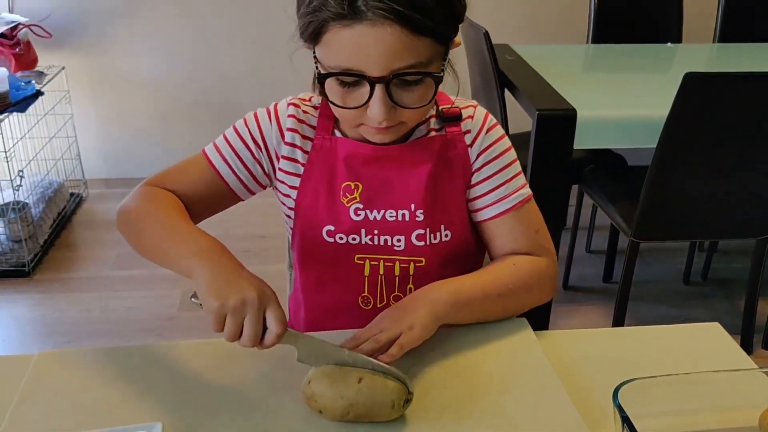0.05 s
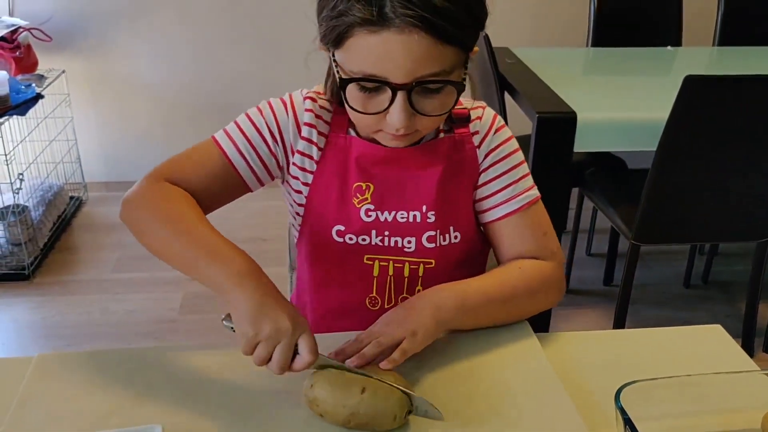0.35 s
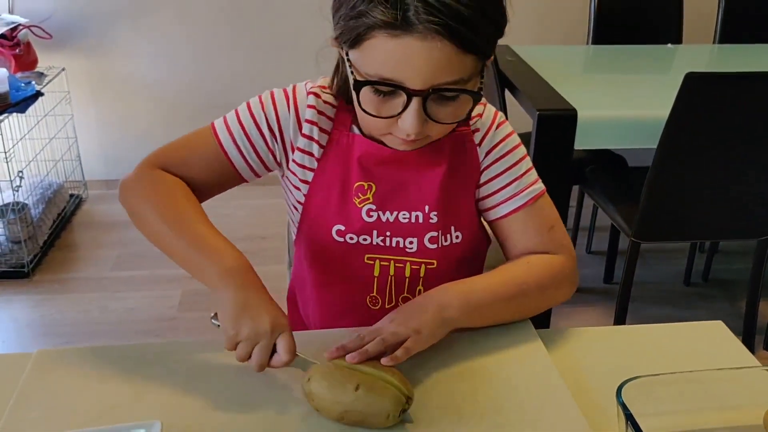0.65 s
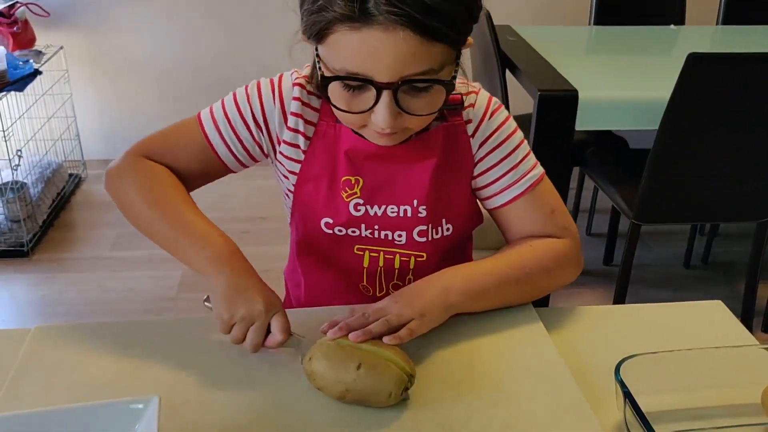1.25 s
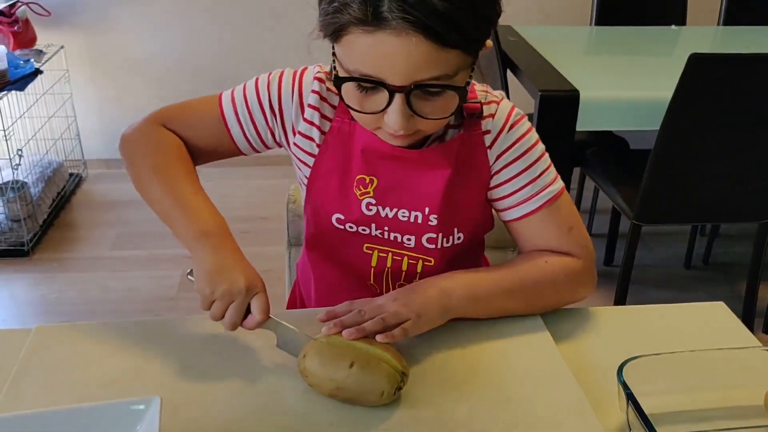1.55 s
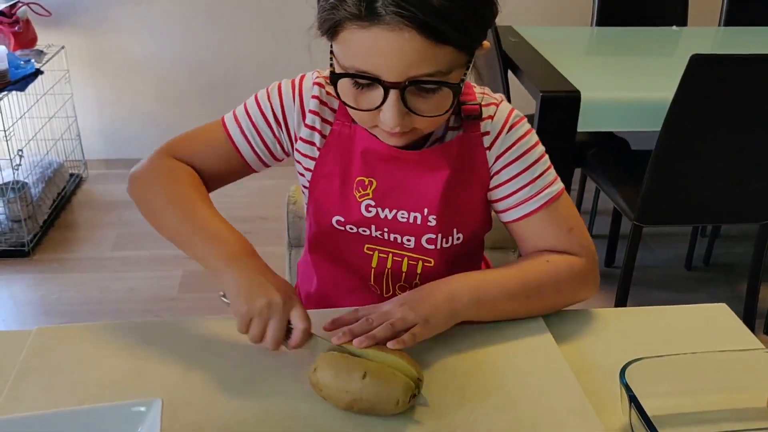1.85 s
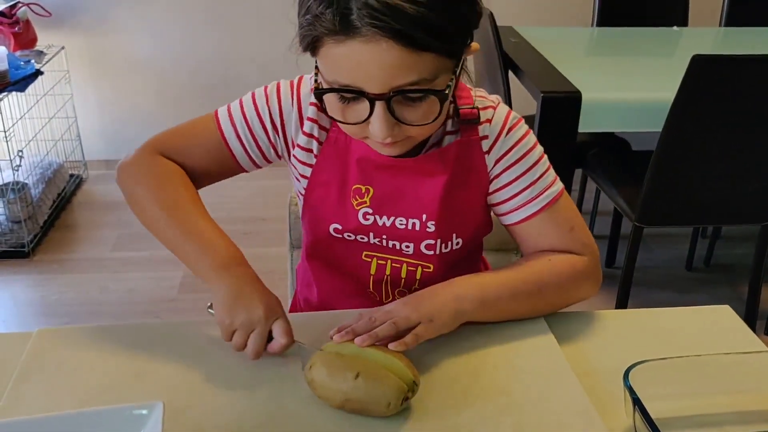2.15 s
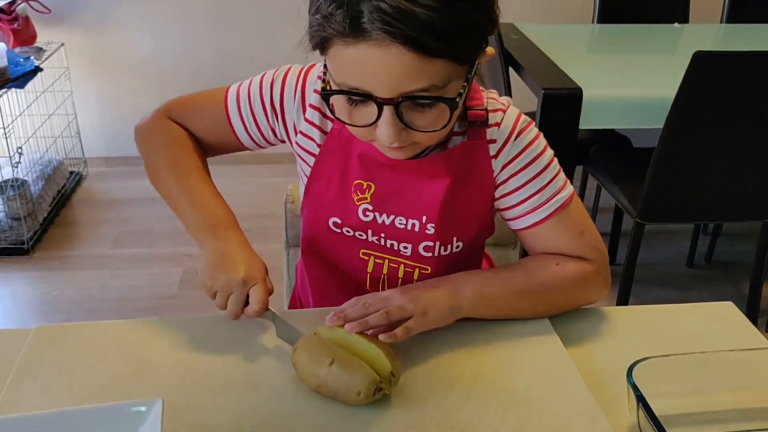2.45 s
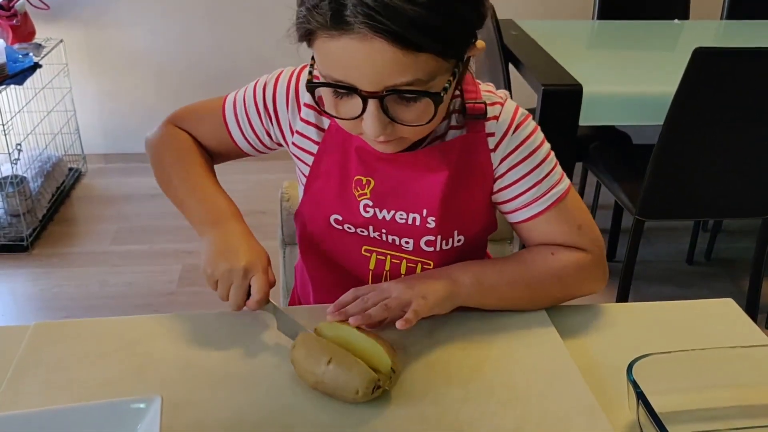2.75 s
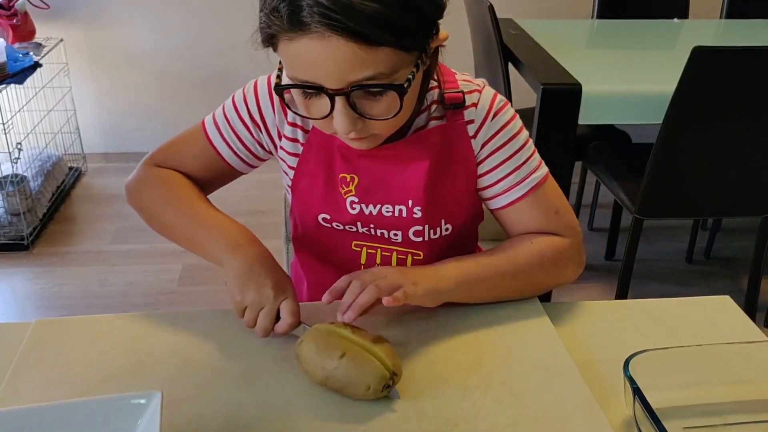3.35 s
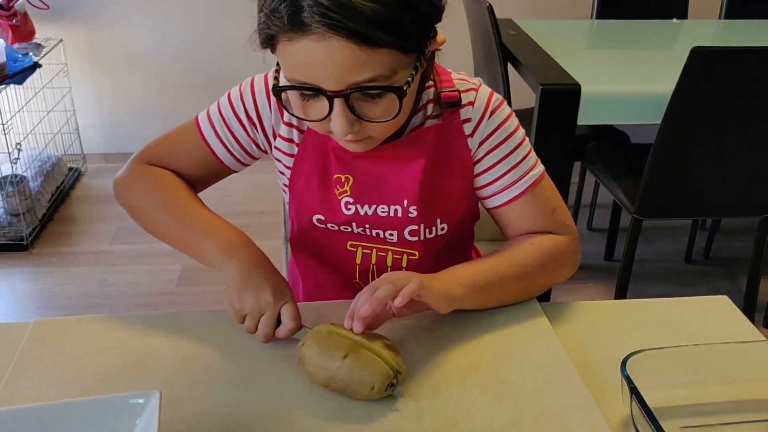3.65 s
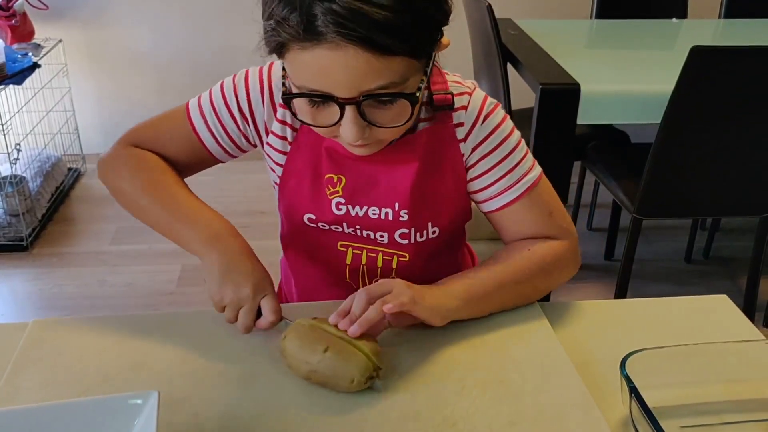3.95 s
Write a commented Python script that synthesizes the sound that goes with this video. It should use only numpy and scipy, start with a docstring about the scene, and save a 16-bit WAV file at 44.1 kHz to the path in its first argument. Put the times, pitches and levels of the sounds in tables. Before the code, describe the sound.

Soft scratchy knife strokes cut a baked potato on a table over a low appliance hum.

```python
"""A baked potato is cut on a table in a quiet kitchen, heard on a left and a right microphone.
From the start an appliance hums in the room tone and a thin whine slowly rises. Two taps land close
to the right microphone as the knife starts sawing, its rasp made of friction and tiny tears of skin.
About a second in, the blade knocks on the table and rebounds. The uneven strokes go on, and in the
second half hand and potato bump softly on the table."""
import sys
import numpy as np
from scipy import signal
from scipy.fft import rfft, irfft
from scipy.io import wavfile

SR = 44100
rng = np.random.default_rng(int(sys.argv[2]) if len(sys.argv) > 2 else 0)


def persist_wave(psi):
    """Save psi, clipped to +-1, as 16-bit WAV."""
    counts = np.round(np.clip(psi, -1, 1) * 32767).astype(np.int16)
    wavfile.write(sys.argv[1], SR, np.atleast_2d(counts).T)


N = 176400
T = np.arange(N) / SR

# Room tone at the microphones. Each row: frequency in Hz, left and right level in relative dB.
AIR_SPECTRUM = [(19.7, -1, -15), (50, 14, 1), (72.6, 0, -14.5), (151, -4.5, -8.5), (265, -7.5, -18),
                (700, -9.5, -11.5), (1460, -16, -20), (2400, -18, -20), (3500, -24, -22.5),
                (4630, -19, -20.5), (5840, -55, -16.5), (7000, -27, -52), (9850, -34, -34),
                (14800, -32.5, -32.5)]
# The appliance's tones. Each row: frequency in Hz, rms level in dB before panning.
HUM_TONES = [(50, -53), (100, -56.5), (155.5, -74), (300, -73.5), (409.5, -70.5), (444.5, -66),
             (581.5, -69), (718, -75.5), (1046, -82.5)]
# The whine's short swells. Each row: time in seconds, level in dB before panning.
WHINE_SWELLS = [(0, -68), (0.1, -57.5), (0.17, -67), (0.26, -60), (0.32, -68), (0.45, -60), (0.58, -58.5),
                (0.83, -70), (0.97, -60), (1.21, -72), (1.26, -61), (1.33, -73), (1.39, -60), (1.5, -66),
                (1.58, -60), (1.72, -71), (2.12, -69), (2.6, -61.5), (2.67, -66), (2.72, -58.5),
                (2.8, -57.5), (2.86, -69), (2.91, -61), (3.03, -63), (3.1, -58.5), (3.24, -57), (3.41, -69),
                (3.49, -62), (3.55, -71), (3.64, -59), (3.72, -66), (4, -62)]
# Taps by the right microphone.
# Each row: start in seconds, strength in dB, hardness as a cut-off in Hz, hiss level in dB.
TAP_HITS = [(0.1861, 0, 8200, -36.5), (0.5779, -13.5, 347, -47)]
# A short burst of hiss after each tap. Each row: frequency in Hz, left and right level in relative dB.
TAP_HISS_SPECTRUM = [(100, -16, 18.5), (400, -4, 11.5), (1190, 2.5, 1.5), (3500, -5, 3), (5600, 4, 5),
                     (7900, -23, 6.5), (9470, -36, -6), (10300, -40, -25)]
# The blade pushed and drawn. Each row: time in seconds, rasp level in relative dB.
STROKE_LEVELS = [(0.34, -66), (0.56, -63.5), (0.59, -58.5), (0.62, -61.5), (0.85, -66.5), (0.89, -53.5),
                 (0.975, -55.5), (1.01, -59.5), (1.09, -52), (1.14, -64), (1.19, -60), (1.27, -66.5),
                 (1.34, -57.5), (1.4, -64), (1.45, -54), (1.48, -54.5), (1.55, -66), (1.62, -67.5),
                 (1.66, -56), (1.82, -52), (1.89, -59.5), (1.99, -67.5), (2.16, -60.5), (2.24, -50.5),
                 (2.33, -50.5), (2.38, -58.5), (2.47, -49.5), (2.63, -66.5), (3.21, -70), (3.39, -61),
                 (3.55, -71.5), (3.64, -68), (3.71, -56.5), (3.95, -59), (3.98, -51.5), (4.0, -52)]
# The rasp is brightest on the long push. Each row: time in seconds, treble lift and bass cut in dB.
STROKE_TILT = [(1.4, -1.5), (1.8, 1), (2.2, -1.5)]
# The rasp at the microphones. Each row: frequency in Hz, left and right level in relative dB.
RASP_SPECTRUM = [(500, -18.5, -16), (1460, -23, -22), (1990, -17, -26), (2610, -13, -16),
                 (3470, -17, -22.5), (4460, -10, -16), (4430, -4.5, -33), (5860, 1.35, -12),
                 (6460, -3.5, -10.5), (7480, -27.5, -3), (8060, -21, -6), (9210, -29, -21.5),
                 (9800, -42, -32), (14000, -30, -30)]
# Larger snaps of the skin. Each row: start in seconds, strength in dB.
SKIN_SNAPS = [(0.515, -25.5), (0.583, -32), (0.965, -19), (1.04, -15), (1.083, -23), (1.19, -28),
              (2.04, -31), (2.88, -29), (3.375, -25.5)]
# The blade on the table. Each row: start in seconds, strength in dB, thinness as a low cut in Hz.
BLADE_KNOCKS = [(1.0327, -42.5, 0), (1.051, -43, 2400)]
# Damped modes of blade and table. Each row: frequency in Hz, gain in dB, seconds to fall by 60 dB.
BLADE_TABLE_MODES = [(660, 7, 0.035), (800, 1, 0.03), (1020, 9, 0.028), (1400, 1, 0.035), (1680, 2, 0.025),
                     (2120, 0, 0.04), (2570, 7, 0.022), (3090, -4, 0.035)]
# Hand and potato on the table. Each row: start in seconds, strength in dB.
TABLE_BUMPS = [(2.19, -9), (3.21, -7), (3.745, -14), (3.855, -6.5)]


def from_db(db):
    """Decibels to gain."""
    return 10 ** (np.asarray(db) / 20)


def rms_one(x):
    """Scale to unit rms."""
    return x / np.sqrt(np.mean(x ** 2) + 1e-20)


def pan(db):
    """Gains at the two microphones; positive leans left."""
    return from_db(np.array([[db], [-db]]))


def curve(rows):
    """Join rows of time and value by straight lines."""
    return np.interp(T, *np.transpose(rows))


def drift(rate_hz):
    """Slow random wander with a spread of 1."""
    hop, settle = 40, 2000
    pole = np.exp(-2 * np.pi * rate_hz * hop / SR)
    noise = rng.standard_normal(N // hop + settle + 2)
    slow = signal.lfilter([1], [1, -2 * pole, pole * pole], noise)[settle:]
    return np.interp(np.arange(N) / hop, np.arange(len(slow)), rms_one(slow))


def butter(x, hz, kind, order=2):
    """Butterworth low-, high- or band-pass."""
    sos = signal.butter(order, np.clip(hz, 10, 0.45 * SR), kind, fs=SR, output="sos")
    return signal.sosfilt(sos, x + 1e-18)


def colour(x, spectrum):
    """Give each microphone its spectrum, keeping the overall power of white noise."""
    hz, *sides = np.transpose(spectrum)
    log_hz = np.log(np.arange(N // 2 + 1) * SR / N + 1)
    gains = from_db([np.interp(log_hz, np.log(hz), side) for side in sides])
    return irfft(rfft(x) * rms_one(gains), N)


def clicks(rows):
    """One impulse for each row of start in seconds and strength in dB."""
    out = np.zeros(N)
    for start, db in rows:
        out[int(start * SR)] += from_db(db)
    return out


def decay(t, t60):
    """A fade that falls by 60 dB in t60 seconds."""
    return np.exp(-np.log(1000) * t / t60)


def ring(x, hz, t60):
    """A unit click sets a sine of height 1 ringing."""
    pole, angle = decay(1 / SR, t60), 2 * np.pi * hz / SR
    return signal.lfilter([0, np.sin(angle)], [1, -2 * pole * np.cos(angle), pole * pole], x + 1e-18)


def room(x, wet_db, early_db=8):
    """Each microphone gets the direct sound, then early reflections and a tail, at constant power."""
    t = T[:SR]
    fade = decay(t, t60=0.65) + from_db(early_db) * decay(t, t60=0.085)
    tail = rng.standard_normal((2, SR)) * fade * (t > 0.001)
    tail /= np.sqrt(np.sum(tail ** 2, axis=1, keepdims=True))
    reflections = signal.fftconvolve(np.atleast_2d(x), tail, axes=1)[:, :N]
    wet = from_db(wet_db)
    return (x + wet * reflections) / np.hypot(1, wet)


def air():
    """Room tone, alike at both microphones in the bass and unrelated in the treble."""
    split_hz = 506
    shared = butter(rng.standard_normal(N), split_hz, "low")
    separate = butter(rng.standard_normal((2, N)), split_hz, "high")
    return from_db(-53) * colour(shared + separate, AIR_SPECTRUM)


def hum():
    """An appliance just left of centre: mains hum and motor tones, each wavering a little."""
    tones, waver_db = np.zeros(N), 1.2
    for hz, db in HUM_TONES:
        peak = np.sqrt(2) * from_db(db + waver_db * drift(rate_hz=3))
        tones += peak * np.sin(2 * np.pi * (hz * T + rng.random()))
    return pan(db=1) * tones


def whine():
    """A thin tone to the left climbs steadily and flutters differently at each microphone."""
    start_hz, rise_hz_per_s = 5402, 72
    waver_db, sway_rad, flutter_hz = 1.5, 0.4, 8
    phase = 2 * np.pi * np.cumsum(start_hz + rise_hz_per_s * T) / SR
    sides = []
    for _ in range(2):
        peak = np.sqrt(2) * from_db(curve(WHINE_SWELLS) + waver_db * drift(flutter_hz))
        sides.append(peak * np.sin(phase + sway_rad * drift(flutter_hz)))
    return pan(db=3) * np.array(sides)


def taps():
    """Close to the right microphone: each tap is a pulse with a thud and a tiny ring, then brief hiss."""
    left_db, hiss_s = -26, 0.091
    placement = from_db([[left_db], [0]])
    hiss = colour(rng.standard_normal((2, N)), TAP_HISS_SPECTRUM)
    out = np.zeros((2, N))
    for start, db, hardness_hz, hiss_db in TAP_HITS:
        pulse = clicks([(start, db)])
        thud = from_db(18.5) * butter(pulse, 310, "low", order=1)
        tick = from_db(-14.5) * ring(pulse, hz=8000, t60=0.00096)
        hit = butter(pulse + thud + tick, hardness_hz, "low", order=4)
        hit = butter(hit, 60, "high", order=1)
        age = np.maximum(T - start, 0)
        fade = (T > start) * decay(age, t60=0.28) / (1 + (age / hiss_s) ** 8)
        out += from_db(hiss_db) * fade * hiss - placement * hit
    return out


def tears():
    """Moist skin gives way in tiny pops, each with its own size and pitch."""
    pops_per_s, spread_db = 3000, 2.3
    edges_hz = np.linspace(300, 16000, 15)
    sizes = from_db(spread_db * np.minimum(rng.exponential(1, N), 5))
    signs = rng.choice([-1, 1], N)
    pops = sizes * signs * (rng.random(N) < pops_per_s / SR)
    bands = list(zip(edges_hz, edges_hz[1:]))
    band_of_pop = rng.integers(0, len(bands), N)
    return sum(butter(pops * (band_of_pop == k), band, "band") for k, band in enumerate(bands))


def rasp():
    """The knife saws: tiny tears over smooth friction follow the stroke, with a few larger snaps."""
    grain_share, catch_db, tilt_hz = 0.7, -1.06, 5500
    grain = rms_one(room(tears(), wet_db=0))
    smooth = rng.standard_normal((2, N))
    friction = np.sqrt(grain_share) * grain + np.sqrt(1 - grain_share) * smooth
    catching = catch_db * drift(rate_hz=23)  # the blade catches and slips
    strokes = friction * from_db(curve(STROKE_LEVELS) + 4 + catching)
    tilt = from_db(curve(STROKE_TILT))
    lows = butter(strokes, tilt_hz, "low", order=3) / tilt
    highs = butter(strokes, tilt_hz, "high", order=3) * tilt
    snaps = room(clicks(SKIN_SNAPS), wet_db=17)
    return colour(lows + highs + snaps, RASP_SPECTRUM)


def knock():
    """A little to the left, the blade meets the table with a dull clack and rebounds with a clink."""
    blows = sum(butter(clicks([(start, db)]), low_hz, "high") for start, db, low_hz in BLADE_KNOCKS)
    modes = sum((-1) ** k * from_db(db) * ring(blows, hz, t60)
                for k, (hz, db, t60) in enumerate(BLADE_TABLE_MODES))
    clack = from_db(41) * butter(blows, [600, 1500], "band")
    return pan(db=1.5) * room(modes + clack, wet_db=5, early_db=6)


def bumps():
    """Hand and potato thud faintly on the table, reaching the microphones mostly through the room."""
    thuds = butter(clicks(TABLE_BUMPS), [147, 440], "band")
    return room(thuds, wet_db=4.5)


def scene():
    """Knife, taps and bumps over the steady sounds of the kitchen."""
    return rasp() + knock() + taps() + hum() + whine() + air() + bumps()


def record(dry):
    """Both microphone channels pass through a steep treble cut."""
    cutoff_hz = 15650
    return signal.sosfilt(signal.ellip(10, 0.1, 70, cutoff_hz, fs=SR, output="sos"), dry)


dry = scene()
out = record(dry)
persist_wave(out)
```